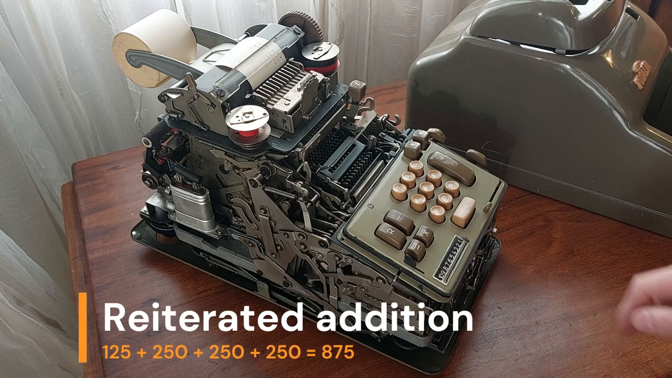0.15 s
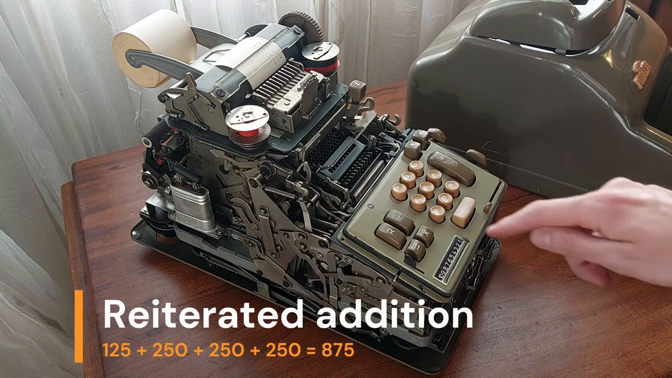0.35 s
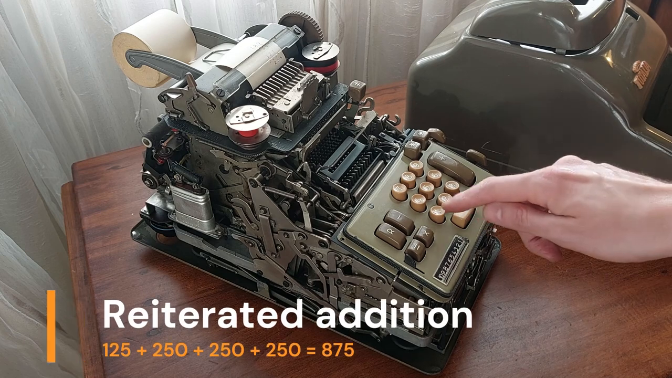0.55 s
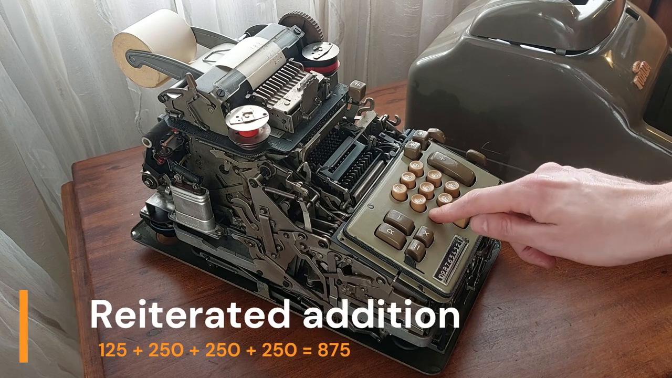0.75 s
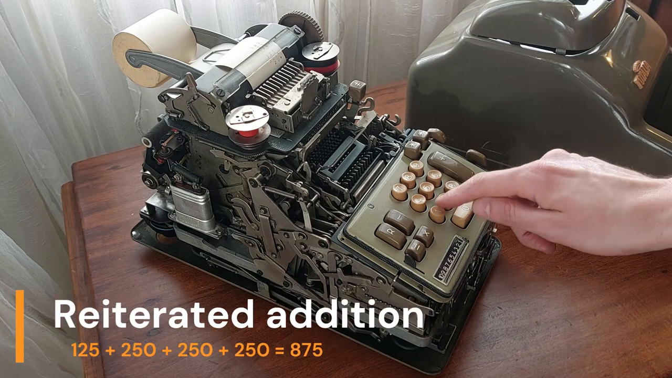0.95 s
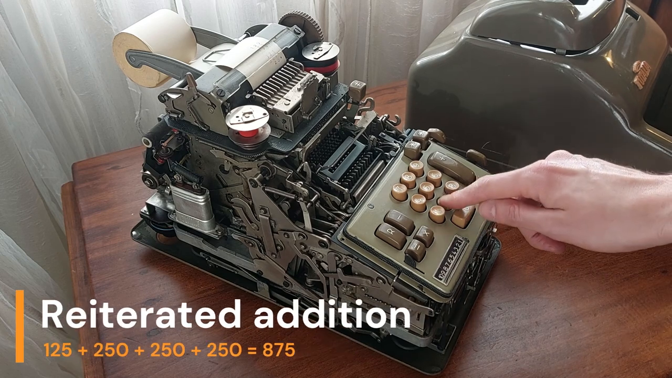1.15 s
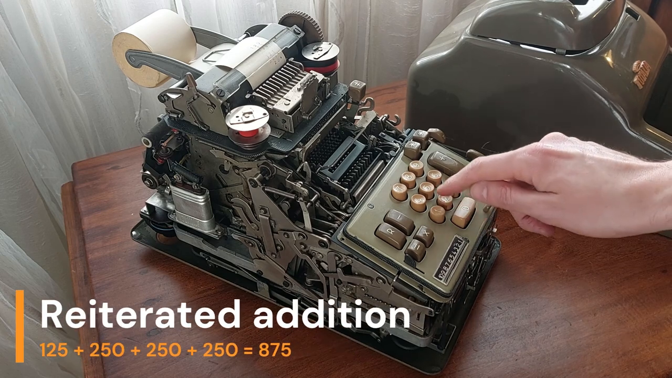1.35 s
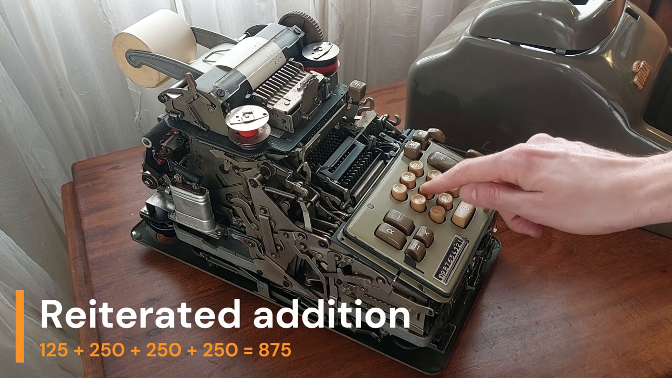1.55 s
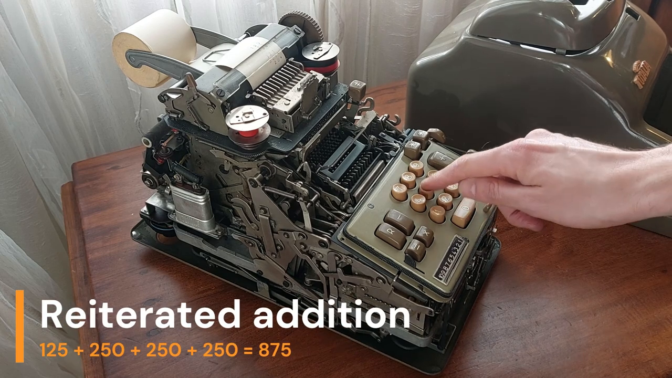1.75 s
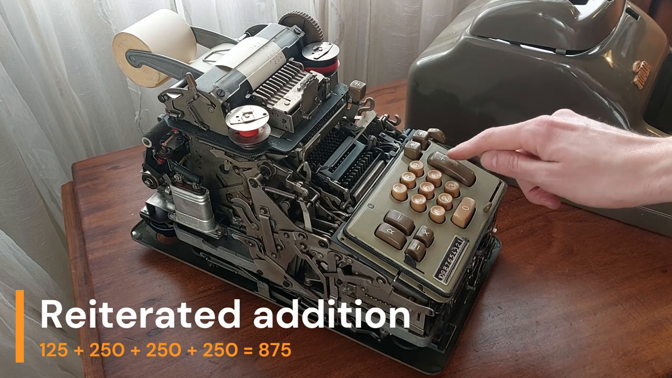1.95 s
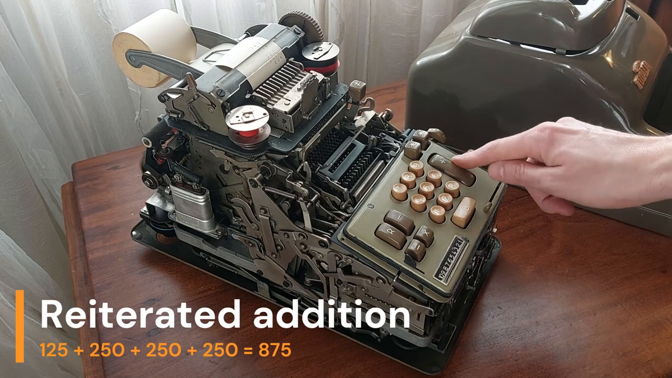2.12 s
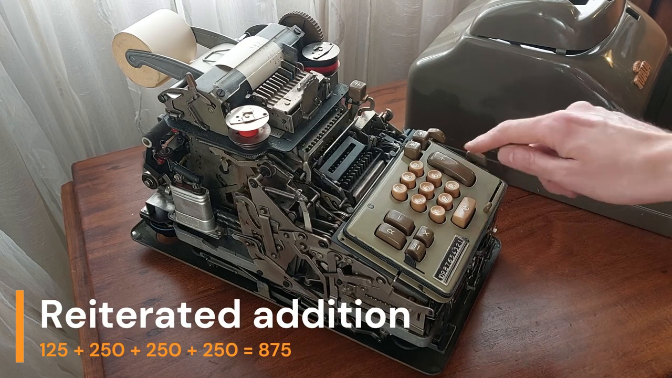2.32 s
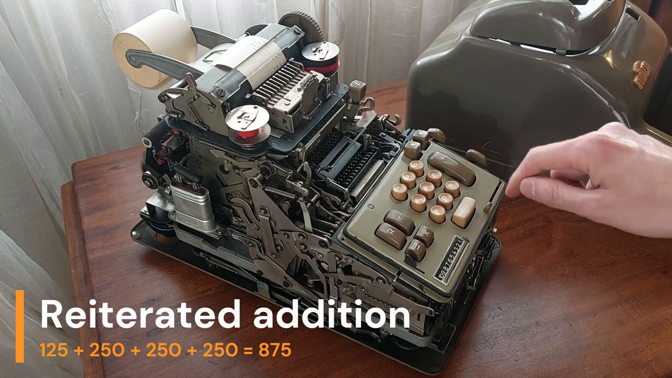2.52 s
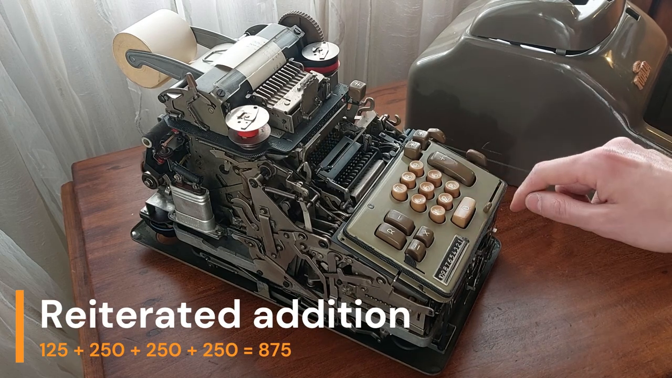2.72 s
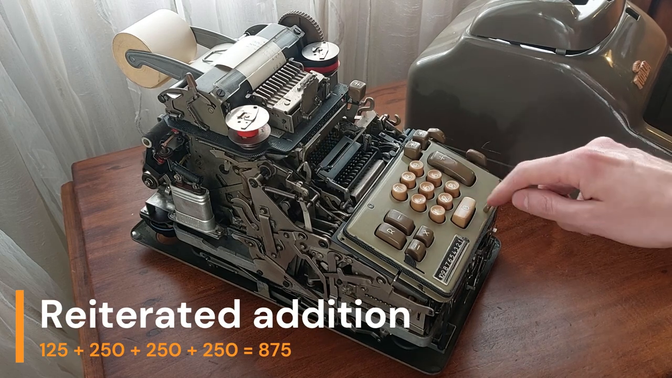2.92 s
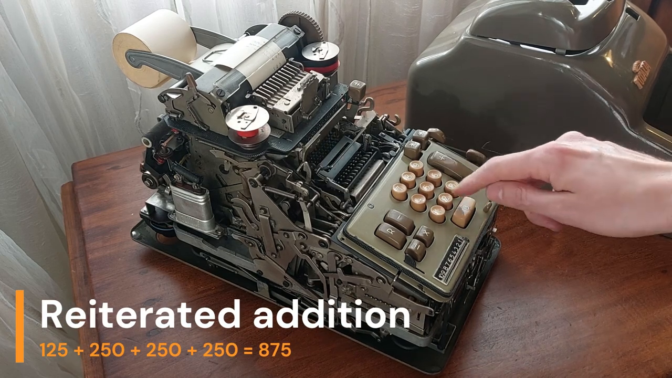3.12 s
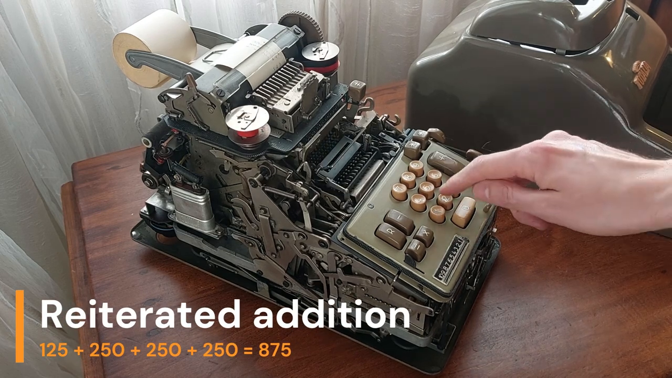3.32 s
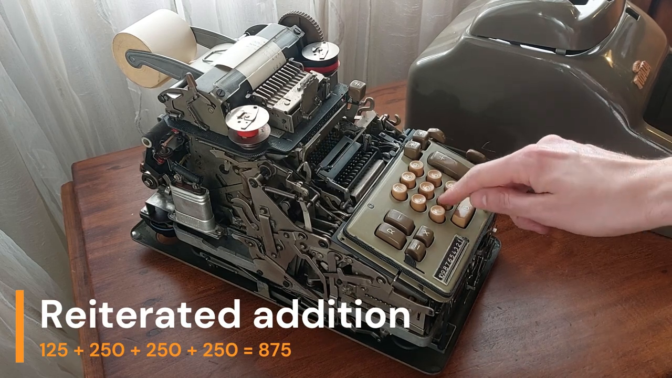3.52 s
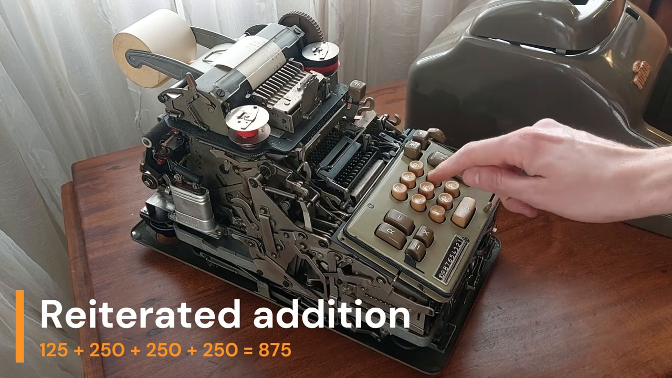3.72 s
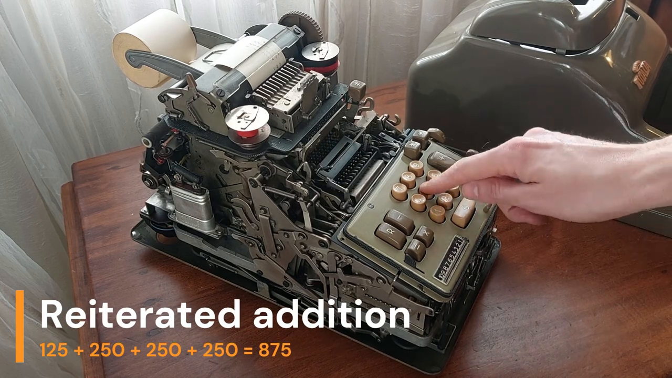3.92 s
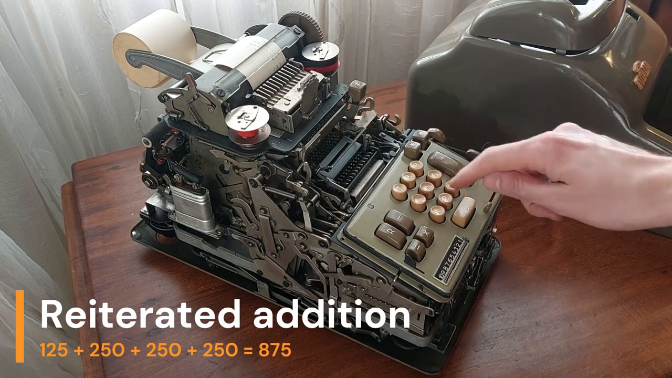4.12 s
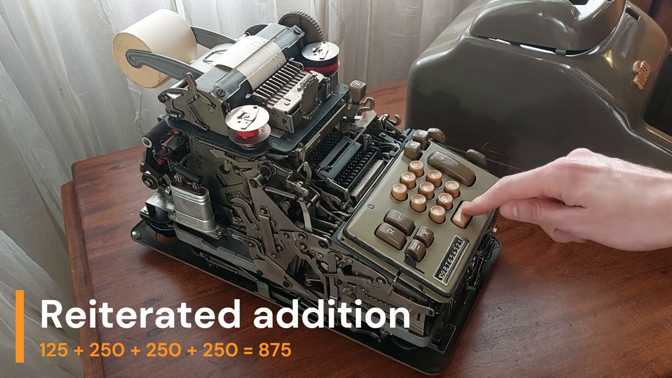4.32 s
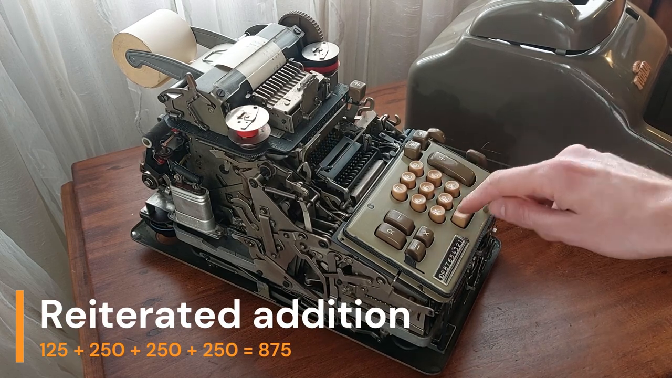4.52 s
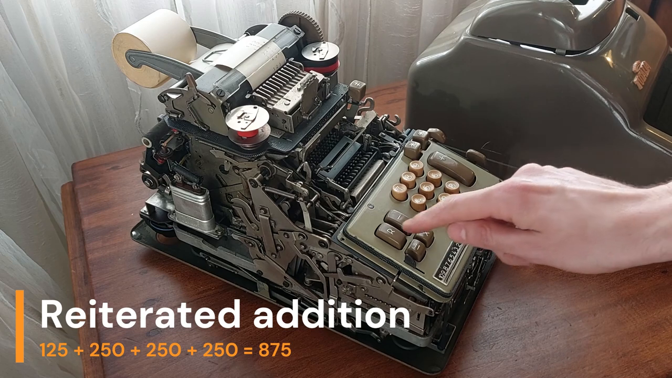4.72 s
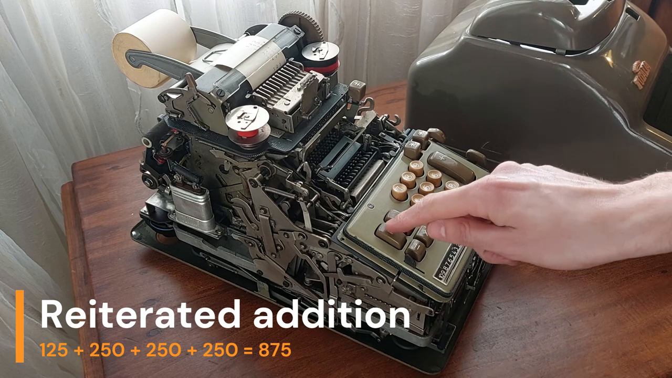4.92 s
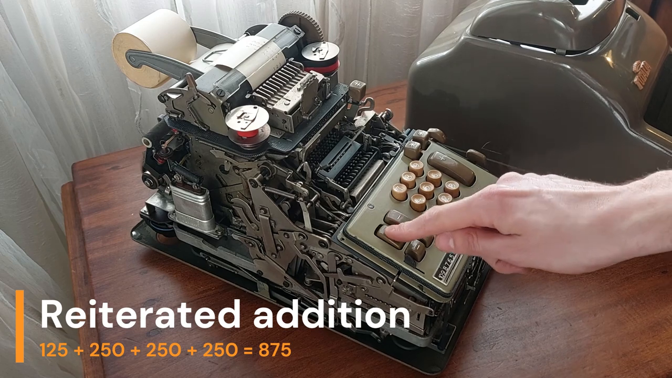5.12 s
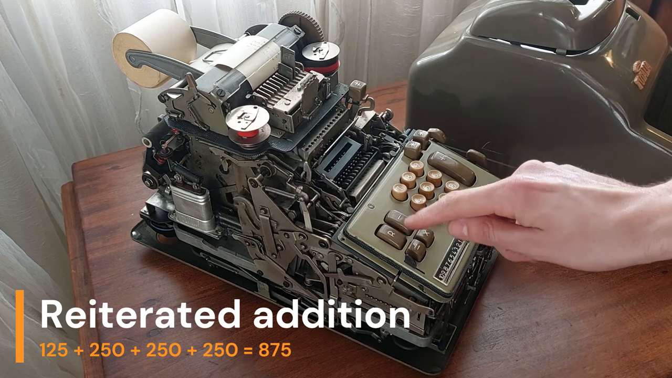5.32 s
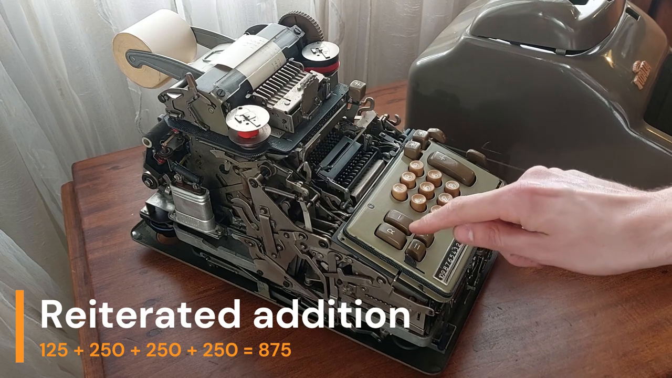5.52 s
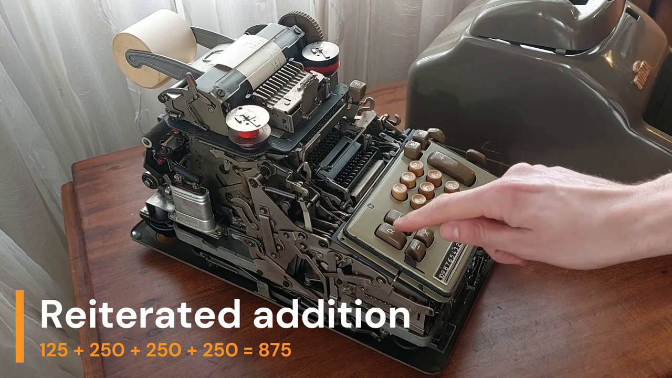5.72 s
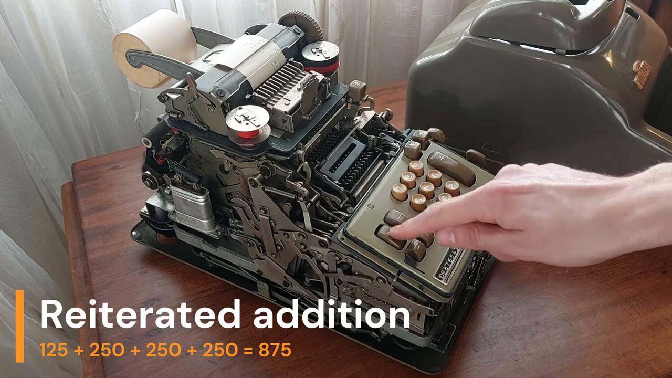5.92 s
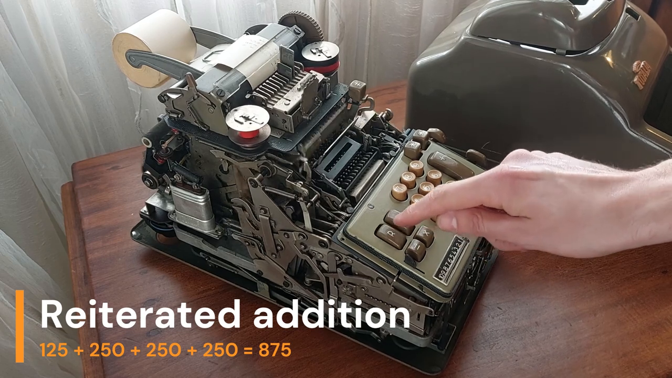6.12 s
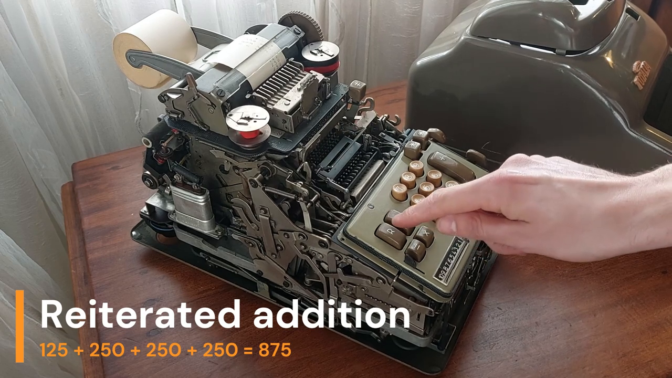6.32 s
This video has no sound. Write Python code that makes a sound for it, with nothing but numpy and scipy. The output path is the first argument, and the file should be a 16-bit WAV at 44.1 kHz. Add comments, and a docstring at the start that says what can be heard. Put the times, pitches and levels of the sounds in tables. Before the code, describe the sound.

Adding machine keys snap and clatter in two groups of three, each answered by a motor-driven burst of steel levers, with a further burst closing.

```python
"""A small room, where an uncased electromechanical adding machine on a wooden table is heard from close by.
Two three-digit numbers are keyed in: each key snaps a pin home, then lets the pin carriage clatter one step on.
Three times the motor turns the cams, which throw racks, type bars and paper feed in the same order, then coasts.
Steel parts are noise bursts with short modes; frame and table are decaying sines driven by the same blows."""
import sys
import numpy as np
from scipy import signal
from scipy.fft import rfft, irfft, next_fast_len
from scipy.io import wavfile

SR = 44100
rng = np.random.default_rng(int(sys.argv[2]) if len(sys.argv) > 2 else 0)


def transcribe(signal):
    """Save signal, clipped to [-1, 1], as a 16-bit WAV file at the path in sys.argv[1]."""
    frames = np.atleast_2d(signal).T
    limited = np.clip(frames, -1, 1)
    pcm = np.round(limited * 32767).astype(np.int16)
    wavfile.write(sys.argv[1], SR, pcm)


N = 280035
TIME = np.arange(N) / SR
TOP_HZ = 15900  # upper limit of steel modes and of the final band

# All levels in the event tables are relative: each source adds its own fixed gain.
# a finger lands on a key and takes up its slack: (time [s], level [dB])
FINGER_TOUCHES = [(0.967, -28.5), (1.368, -26.5), (1.832, -27), (2.342, -42.5), (3.638, -34), (4.106, -26),
                  (4.547, -20)]
# keys snap down: (time [s], level [dB], resonance [Hz], thump level [dB], resonance boost [dB])
KEY_PRESSES = [(0.9915, -14.5, 3030, -32, 5.5), (1.412, -17, 2400, -30.5, 11),
               (1.8568, -20, 2440, -33.5, 8.5), (3.6571, -24, 2610, -38, 8.5), (4.127, -23, 13100, -32, -2),
               (4.5625, -19.5, 2680, -31, 8)]
# keys come up and the carriage steps:
# (time [s], level [dB], pitch of the key's own return spring [Hz], level of that spring [dB])
KEY_RELEASES = [(1.1967, -14, 5775, -55), (1.5872, -12.3, 5775, -47), (2.0347, -13.3, 7226, -50),
                (3.8458, -18.3, 11270, -46), (4.2680, -12, 7226, -51), (4.7231, -10.8, 7226, -34)]
# key return springs: (pitch [Hz])
RETURN_SPRINGS = [5775, 7226, 11270]
# turns of the main shaft: (clutch time [s], lead of the trip [s], duration [share of a normal turn],
# level of the steel [dB], load on the frame [dB])
SHAFT_TURNS = [(2.3925, .029, 1.0, -0.24, 0), (5.3697, .042, 0.97, -0.5, 0), (6.1457, .039, 0.872, -3, -2)]
# levers thrown by the cams on every turn: (time after the clutch in a normal turn [s], level [dB],
# resonance [Hz], thump level [dB], resonance boost [dB])
CAM_BLOWS = [(-0.011, -16, 5000, -28, -5), (-0.001, -5, 4480, -26, 1), (0.034, -13.5, 1900, -25, 10),
             (0.065, -7.5, 3500, -18.5, -1), (0.087, -13.5, 7500, -18, 4.5), (0.104, -10, 4400, -17, 5.5),
             (0.125, -5.5, 10500, -22.5, 15), (0.164, -3.5, 1650, -24.5, 11), (0.174, -3, 1950, -19, 7.5),
             (0.195, -12.5, 2100, -26.5, 5), (0.219, -9.5, 12100, -18, 13), (0.228, -9, 2302, -17, 14),
             (0.251, -10, 2550, -20.5, -3.5), (0.283, -9, 1424, -31.5, 16.5), (0.314, -10, 5000, -25, -0.5),
             (0.336, -4.5, 14100, -25.5, 6), (0.360, -4, 13180, -24.5, 3.5), (0.395, -19, 2426, -33, 4)]
# the linkage gathers speed, works and comes to rest:
# (time after the clutch in a normal turn [s], chatter level [dB], load on the frame [dB])
LINKAGE_STROKE = [(-0.03, -31, -29.5), (-0.005, -27, -32), (0.045, -31.5, -34), (0.09, -24.5, -19.5),
                  (0.16, -34, -33), (0.25, -28.5, -22.5), (0.35, -27, -29), (0.405, -31, -25.5)]
# modes of frame and table: (frequency [Hz], decay by 60 dB before damping [s],
# level under the linkage [dB], under a key press [dB], under a key release [dB])
BODY_MODES = [(70.6, 0.31, -25, -3.5, -14.5), (83, 0.32, -15, 2, -25), (116.1, 0.36, -9.5, -2, -19.5),
              (169.2, 1, -17.5, -11.5, -19.5), (201.4, 0.5, -6, -2.5, -16.5), (240, 0.55, 0, 5.5, -17.5),
              (267.7, 0.45, 0.5, 8.5, -17.5), (293.6, 0.47, -2.5, 8.5, -2.5), (348.7, 0.1, -7.5, 0.5, -19),
              (407.9, 0.33, -3.5, 4, -5), (435.7, 0.36, -7, 0.5, 0), (518.2, 0.29, -13, -8, -12),
              (605, 0.28, -17, -27.5, -17), (644, 0.14, -13, -6.5, -9), (732.6, 0.34, -14.5, -12, -24.5),
              (833, 0.12, -24, -35.5, -20), (1016, 0.15, -20, -15, -17), (1210, 0.26, -36, -59.5, -24.5),
              (1379, 0.099, -26.5, -36.5, -4), (1444, 0.13, -22.5, -17.5, -13.5)]
# spectrum of struck steel parts: (frequency [Hz], density [dB per Hz])
STEEL_SPECTRUM = [(250, -9), (600, 0), (1000, -2.5), (1600, -0.5), (2300, 2), (3200, -2), (4700, 0),
                  (6300, -1), (8200, -1), (10000, -4), (12500, 0), (16000, -1.5)]
# spectrum of the coasting gear teeth: (frequency [Hz], density [dB per Hz])
GEAR_SPECTRUM = [(400, -7), (700, -4.5), (1200, -1), (2300, -7), (3500, -8), (6000, -1.5), (9500, -4),
                 (11500, -1.5), (16000, -9.5)]
# dull knock of the table top under a key: (frequency [Hz], density [dB per Hz])
WOOD_SPECTRUM = [(60, -19), (150, -12.5), (230, -1), (330, 1.5), (450, 4.5), (560, -18), (700, -9),
                 (1000, -19.5), (1400, -22), (2500, -28.5)]
# spectrum of the quiet room: (frequency [Hz], density [dB per Hz])
ROOM_SPECTRUM = [(25, -8.5), (53, -2.5), (82, -16.5), (120, -5), (160, -22.5), (200, -12.5), (285, -12.5),
                 (400, -27), (650, -34), (1200, -39.5), (2500, -45.5), (5000, -49.5), (16000, -50.5)]
# lead of the left microphone over the right: (frequency [Hz], level difference [dB])
LEFT_LEAD = [(60, 5.5), (120, 1.5), (250, -1), (600, 3), (2400, 2.5), (5000, 6), (9000, 6), (14000, 1)]
# narrow murmur of the gear train: (frequency [Hz], density [dB per Hz])
MURMUR_SPECTRUM = [(300, -20.5), (800, -12), (1000, 12), (1200, 6.5), (1500, -8.5), (3500, -39.5)]
# bounces of the carriage after a step: (time [s], level [dB])
CARRIAGE_BOUNCES = [(0, 9.3), (.005, 6), (.013, 2.7)]

SNAP_T60_S, BLOW_T60_S, SPRING_T60_S = .011, .019, .3
SLACK_S, SLACK_DB = 0.0055, -2  # the stem meets its guide just after the finger lands
LATCH_LEAD_S, LATCH_DB = .012, -0.5  # the latch lets go just before each step
STEP_THUMP_DB, STEP_KNOCK_DB = 10.5, 11  # frame and table follow the strength of the step
SYMPATHY_DB = -35.5  # every carriage step shakes all the springs a little
TRIP_DB, TRIP_THUMP_DB = -8, -13.5  # the pawl that sets the shaft free
SCATTER_DB = 3.5  # spread in strength among the contacts of a rattle
COAST_AFTER_S, COAST_S = 0.39, .52  # cut-out after the clutch in a normal turn; time to slow to rest
COAST_DB, COAST_POWER = -44, 1.34  # gear drive at full speed, and how steeply it follows speed
MURMUR_DB, MURMUR_SPEED, MURMUR_WIDTH = -68, 0.28, 0.14  # peak drive; centre and width [share of full speed]
MURMUR_SHARE_DB = -16  # a trace of the murmur is always in the gear noise
ROOM_T60_S, ROOM_RISE_S = 0.37, 0.00067
AMBIENCE_DB = -64.5


def undb(db):
    """Level as a logarithm of amplitude: decibels to gain."""
    return 10 ** (np.asarray(db) / 20)


def unit(x):
    """Energy normalisation: the mean energy per channel becomes one."""
    return x / np.sqrt(np.mean(np.sum(x ** 2, axis=-1)))


def fade(t, t60):
    """Exponential damping: decay by 60 dB in t60 seconds."""
    return np.exp(-np.log(1000) * t / t60)


def add(out, s, x):
    """Superposition: mix x into out from time s on."""
    i = max(int(s * SR), 0)
    n = max(min(x.shape[-1], N - i), 0)
    out[..., i:i + n] += x[..., :n]


def colour(x, points):
    """Linear filtering by (Hz, dB) points joined on a log-frequency axis."""
    hz, db = np.transpose(points)
    n = next_fast_len(x.shape[-1])
    f = np.maximum(np.fft.rfftfreq(n, 1 / SR), 1)
    gain = undb(np.interp(np.log(f), np.log(hz), db))
    return irfft(rfft(x, n) * gain, n)[..., :x.shape[-1]]


def pair(n, likeness):
    """Partial coherence: left and right noise with the given correlation."""
    c = np.clip(likeness, 0, 1)
    return np.sqrt(c) * rng.standard_normal(n) + np.sqrt(1 - c) * rng.standard_normal((2, n))


def through(x, response):
    """Convolution: pass a signal through an impulse response."""
    return signal.fftconvolve(np.atleast_2d(x), response, axes=-1)[:, :N]


def linkage(count=90):
    """Impact excitation: a pawl trips, cams slam levers into stops, loose parts chatter, the frame rocks."""
    steel, force = np.zeros((2, N)), np.zeros(N)
    for start, lead, length, steel_db, load_db in SHAFT_TURNS:
        trip = clack(bright_hz=2100, bump_db=3.5, crack_t60=0.048, rise_s=.001)
        add(steel, start - lead, undb(TRIP_DB) * room(trip, wet_db=2))
        add(force, start - lead, undb([TRIP_THUMP_DB]))
        for after, db, hz, thump_db, bump_db in CAM_BLOWS:
            s = start + length * after
            blow = clack(hz, bump_db, crack_t60=BLOW_T60_S, rise_s=0.0018)
            add(steel, s, undb(steel_db + db + 11) * room(blow, wet_db=-2))
            add(force, s, undb([load_db + thump_db + 22]))
    motion = stroke(order=1)
    loose = undb(-5.5) * motion * rattle(rate=430, t60=.014, spectrum=STEEL_SPECTRUM)
    moving = np.flatnonzero(motion)
    for when, pitch, size in rng.random((count, 3)):  # pawls and springs, each with its own resonance
        i = moving[int(when * len(moving))]
        clink = clack(1400 * 8 ** pitch, bump_db=11.0, crack_t60=0.044)
        add(loose, i / SR, motion[i] * undb(15.5 + 15.0 * size) * clink)
    force += stroke(order=2) * ticks(rate=300, scatter_db=5.0)
    return steel + room(loose, wet_db=1.5), body(force, order=0, rise_s=0.0031)


def stroke(order):
    """Amplitude envelope: gain from one dB column of the stroke, once for each turn of the shaft."""
    shape = np.array(LINKAGE_STROKE)
    gain = 0
    for s, _, length, *dbs in SHAFT_TURNS:
        after = (TIME - s) / length
        db = np.interp(after, shape[:, 0], shape[:, order], left=-np.inf, right=-np.inf)
        gain = gain + undb(dbs[order - 1] + db)
    return gain


def keys():
    """Impact and free vibration: keys tick, snap and bottom out; latch, carriage and springs answer release."""
    steel, thuds, press, release = np.zeros((2, N)), np.zeros((2, N)), np.zeros(N), np.zeros(N)
    t = np.arange(SR // 2) / SR
    for s, db in FINGER_TOUCHES:
        for delay, contact_db in [(0, 0), (SLACK_S, SLACK_DB)]:
            tick = clack(bright_hz=6000, bump_db=-1, crack_t60=0.088, rise_s=0.0016)
            add(steel, s + delay, undb(db + contact_db + 13.0) * room(tick, wet_db=-5))
        add(press, s, undb([db + 9.5]))
    for s, db, hz, thump_db, bump_db in KEY_PRESSES:
        snap = clack(hz, bump_db, crack_t60=SNAP_T60_S, ring_db=-5, ring_t60=0.047, count=120)
        add(steel, s + .0005, undb(db + 18.5) * room(snap, wet_db=-3.5))
        bottom = clack(hz, bump_db=-2.5, crack_t60=0.051, rise_s=.002)
        add(steel, s + .016, undb(thump_db + 26.0) * room(bottom, wet_db=-1.5))
        add(press, s + .011, push(thump_db + 28.5))
        add(thuds, s + .008, undb(thump_db + 26.5) * knock())
    for s, db, spring_hz, spring_db in KEY_RELEASES:
        latch = clack(bright_hz=5000, bump_db=0.5, crack_t60=0.07, rise_s=0.0016)
        add(steel, s - LATCH_LEAD_S, undb(db + LATCH_DB) * room(latch, wet_db=-1))
        add(release, s - LATCH_LEAD_S, undb([db - 2.5]))
        for delay, bounce_db in CARRIAGE_BOUNCES:
            bounce = clack(bright_hz=7930, bump_db=1.5, crack_t60=0.025, rise_s=0.0017)
            add(steel, s + delay, undb(db + bounce_db) * room(bounce, wet_db=-4.0))
        add(release, s, push(db + STEP_THUMP_DB))
        add(thuds, s, undb(db + STEP_KNOCK_DB) * knock())
        for hz in RETURN_SPRINGS:
            ping_db = spring_db if hz == spring_hz else db + SYMPATHY_DB
            ping = np.sin(2 * np.pi * hz * t + np.array([[0], [1]]))  # 1 rad between left and right
            add(steel, s, undb(ping_db) * fade(t, SPRING_T60_S) * ping)
    boom = body(press, order=1, rise_s=0.0068) + body(release, order=2, rise_s=0.0033)
    return steel, thuds + boom


def push(db, bounce_db=-7, bounce_s=.03, count=5):
    """Impulsive force on the frame: one blow and a few random rebounds, which colour each knock differently."""
    force = np.zeros(SR // 10)
    force[0] = 1
    when = (rng.random(count) * bounce_s * SR).astype(int)
    force[when] += undb(bounce_db) * rng.choice([-1, 1], count)
    return undb(db) * unit(force)


def knock(t60=0.26, rise_s=0.0027):
    """High modal density: the table top's many close modes merge into a thud of decaying noise."""
    t = np.arange(SR // 3) / SR
    wood = colour(pair(len(t), likeness=0.84), WOOD_SPECTRUM)
    return unit(wood * fade(t, t60) * (1 - np.exp(-t / rise_s)))


def clack(bright_hz, bump_db, crack_t60, rise_s=0.00039, ring_db=-7, ring_t60=0.062, count=70):
    """Struck-bar vibration: one small steel part gives a crack and a short ring of its own close modes."""
    t = np.arange(SR // 20) / SR
    hz = np.exp(rng.uniform(np.log(1200), np.log(TOP_HZ), (count, 1)))
    phase = rng.uniform(0, 2 * np.pi, (2, count, 1))
    # sqrt(hz) offsets the log spacing, for even energy per Hz
    ring = np.sum(np.sqrt(hz) * np.sin(2 * np.pi * hz * t + phase), axis=1) * fade(t, ring_t60)
    crack = pair(len(t), likeness=0.078) * fade(t, crack_t60)
    hit = (unit(crack) + undb(ring_db) * unit(ring)) * (1 - np.exp(-t / rise_s))
    hit = np.pad(hit, ((0, 0), (SR // 2000, 0)))  # 0.5 ms of silence first
    spectrum = []
    for f, db in STEEL_SPECTRUM:
        octaves = np.log2(f / bright_hz)
        spectrum.append((f, db + bump_db * np.exp(-(octaves / .5) ** 2)))
    return unit(colour(hit, spectrum))


def coasting():
    """Speed-dependent excitation: slowing gears give a dry rustle, a low murmur and a rumble in the frame."""
    speed = np.zeros(N)  # share of full speed
    for s, _, length, *_ in SHAFT_TURNS:
        speed += np.interp(TIME - s - length * COAST_AFTER_S, [0, COAST_S], [1, 0], left=0)
    turning = undb(COAST_DB) * speed ** COAST_POWER
    teeth = turning * rattle(rate=920, t60=0.0083, spectrum=GEAR_SPECTRUM)
    # the gear train murmurs most as it passes one speed
    passing = (speed > 0) * np.exp(-((speed - MURMUR_SPEED) / MURMUR_WIDTH) ** 2)
    swell = undb(MURMUR_SHARE_DB) * turning + undb(MURMUR_DB) * passing
    murmur = swell * rattle(rate=420, t60=0.023, spectrum=MURMUR_SPECTRUM)
    rumble = body(undb(-4.5) * turning * ticks(rate=270, scatter_db=2), order=0, rise_s=0.0018)
    return teeth + murmur + rumble


def rattle(rate, t60, spectrum):
    """Superposed random impacts: noise follows the summed power of many brief contacts, rms 1."""
    decay = fade(np.arange(SR // 20) / SR, t60)[None]
    power = through(ticks(rate, SCATTER_DB) ** 2, decay ** 2)
    return np.sqrt(N) * unit(colour(np.sqrt(np.abs(power)) * pair(N, likeness=0.19), spectrum))


def ticks(rate, scatter_db):
    """Poisson-like impulses: random contacts per second of uneven strength and either sign, rms 1."""
    contact = rng.random(N) < rate / SR
    strength = undb(scatter_db * rng.standard_normal(N))
    return unit(contact * strength * rng.choice([-1, 1], N)) * np.sqrt(N)


def body(force, order, rise_s):
    """Modal superposition: frame and table ring, and the boom builds as the blow spreads through the wood."""
    t = np.arange(SR // 2) / SR
    response = 0
    for k, (hz, t60, *dbs) in enumerate(BODY_MODES):
        # higher modes differ more in phase between the ears
        apart = min(hz / 1100, 1.2) * rng.choice([-1, 1]) * np.array([[.5], [-.5]])
        envelope = fade(t, 0.66 * t60) * (1 - np.exp(-t / rise_s))
        mode = np.sin(2 * np.pi * hz * t + k * k + apart) * envelope
        response = response + undb(dbs[order]) * unit(mode)
    return through(force, unit(response))


def room(x, wet_db):
    """Reverberation from table, walls and curtains, drawn anew for each sound; the top dies sooner."""
    t = np.arange(SR // 2) / SR
    noise = pair(len(t), likeness=0.023)
    top = signal.sosfilt(signal.butter(1, 7000, "high", fs=SR, output="sos"), noise)
    tail = (noise - top) * fade(t, ROOM_T60_S) + top * fade(t, 0.5 * ROOM_T60_S)
    tail = tail * (1 - np.exp(-t / ROOM_RISE_S))
    out = undb(wet_db) * through(x, unit(tail))
    add(out, 0, x)  # direct sound
    return out


def ambience():
    """Stationary background noise: a faint low rumble fills the room."""
    return undb(AMBIENCE_DB) * np.sqrt(N) * unit(colour(pair(N, likeness=0.46), ROOM_SPECTRUM))


def balance(x):
    """Interchannel level difference: half of the lead raises the left, half lowers the right."""
    sides = []
    for side, sign in zip(x, (1, -1)):
        sides.append(colour(side, [(hz, sign * db / 2) for hz, db in LEFT_LEAD]))
    return np.array(sides)


def scene():
    """Linear superposition of keys, linkage and gears in the room, with the background and stereo balance."""
    key_steel, key_boom = keys()
    lever_steel, lever_boom = linkage()
    gears = room(undb(-3.0) * coasting(), wet_db=-5.5)
    boom = room(key_boom + lever_boom, wet_db=-13)
    return balance(key_steel + lever_steel + gears + boom + ambience())


def record(dry):
    """Band limitation: the microphones lose the deepest bass, and the recorder cuts the top steeply."""
    thin = signal.sosfilt(signal.butter(3, 40, "high", fs=SR, output="sos"), dry)
    return signal.sosfilt(signal.ellip(10, .2, 80, TOP_HZ, fs=SR, output="sos"), thin)


dry = scene()
out = record(dry)
transcribe(out)
```